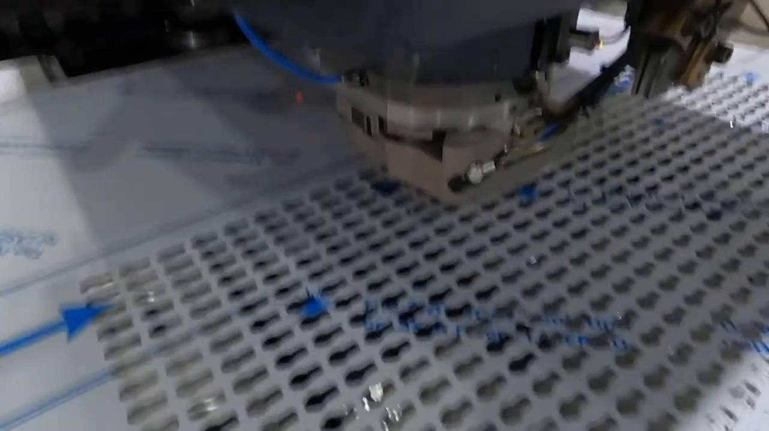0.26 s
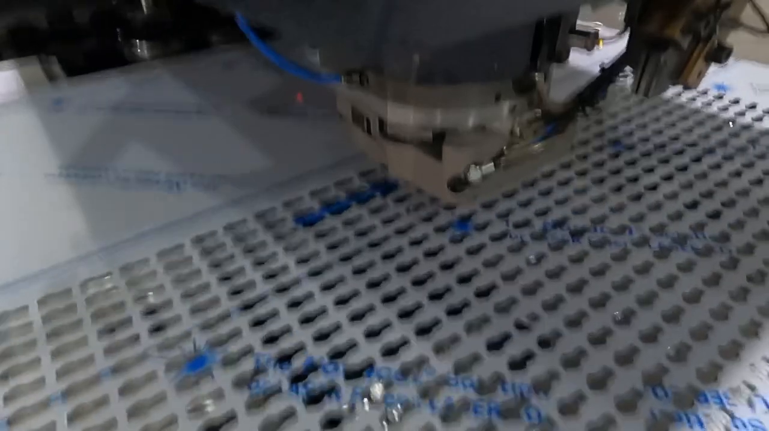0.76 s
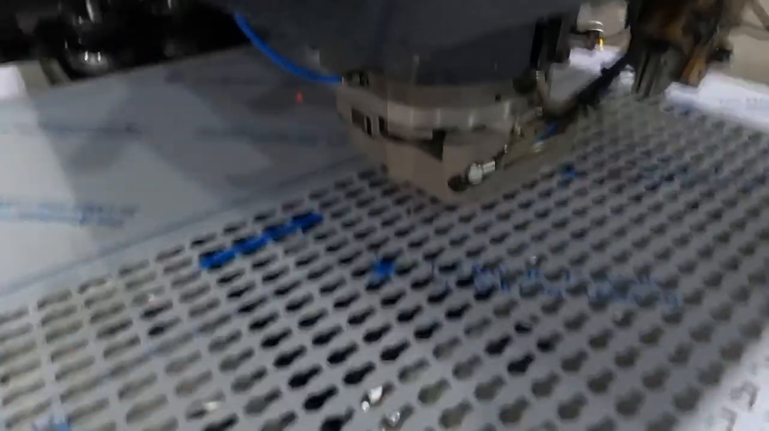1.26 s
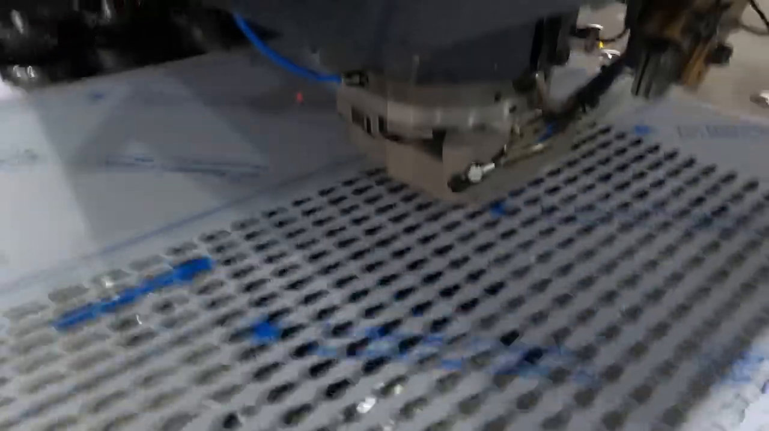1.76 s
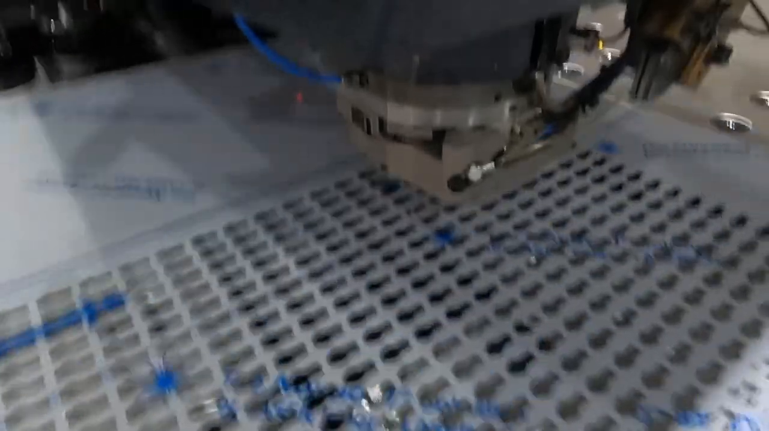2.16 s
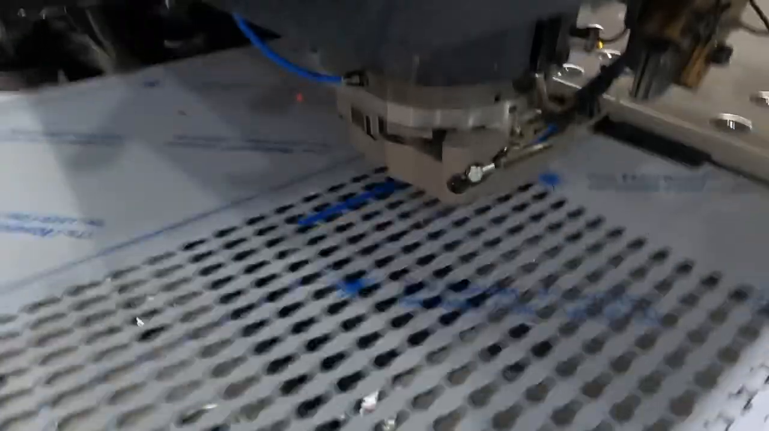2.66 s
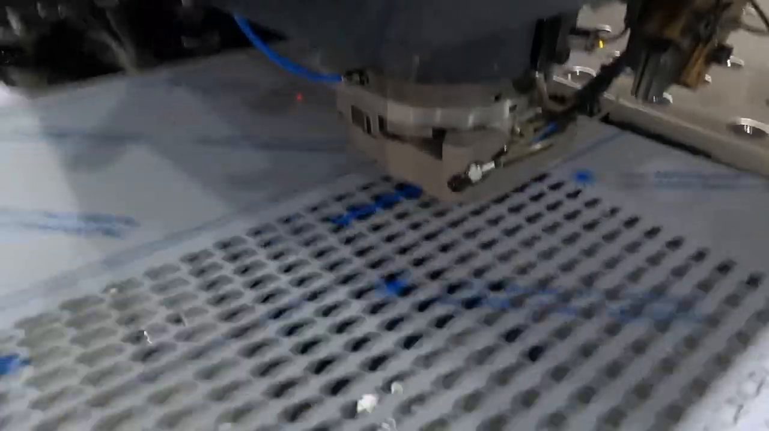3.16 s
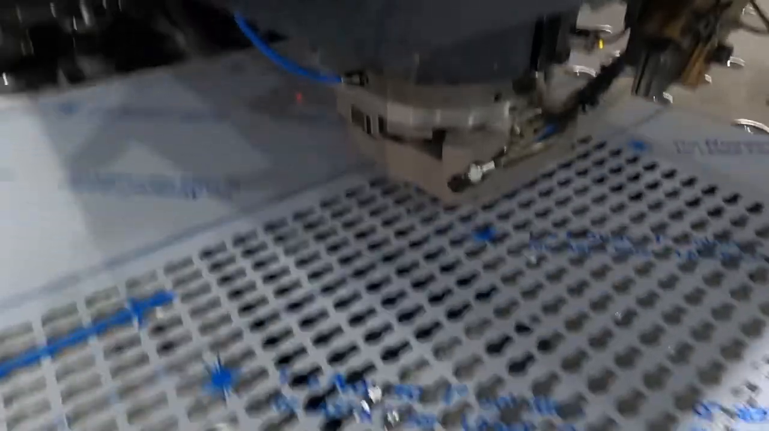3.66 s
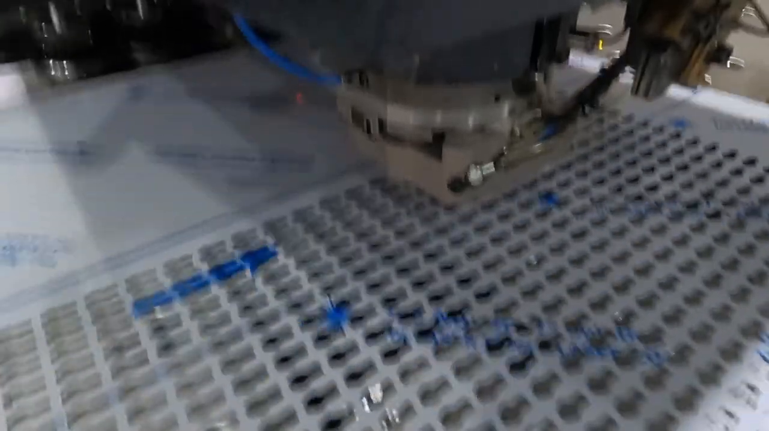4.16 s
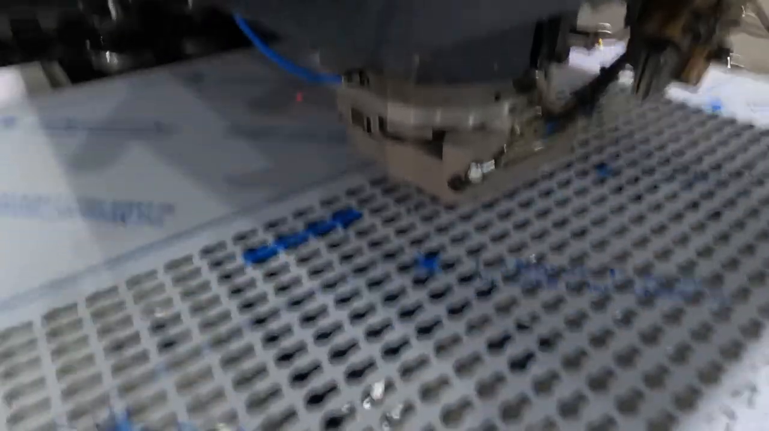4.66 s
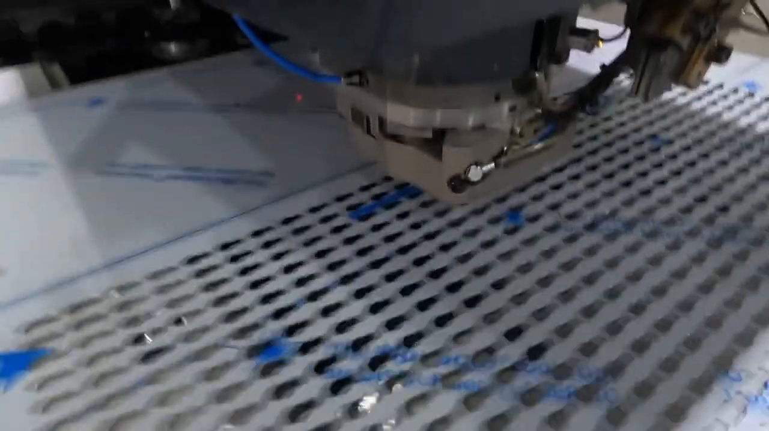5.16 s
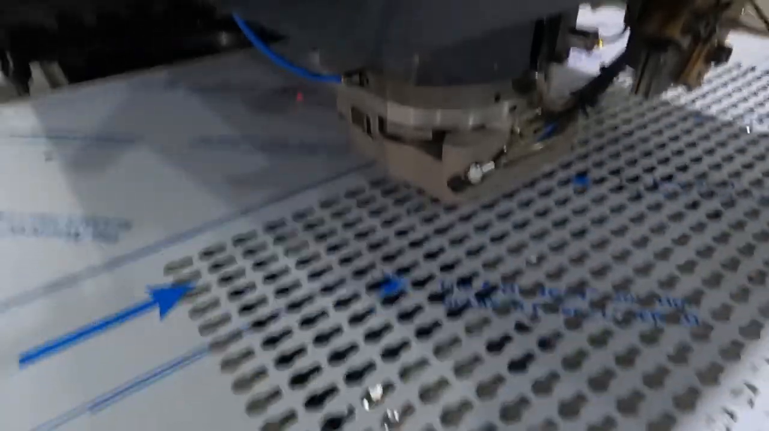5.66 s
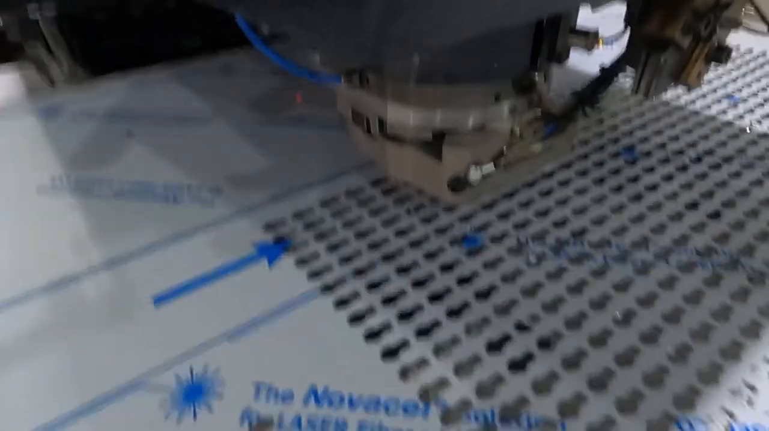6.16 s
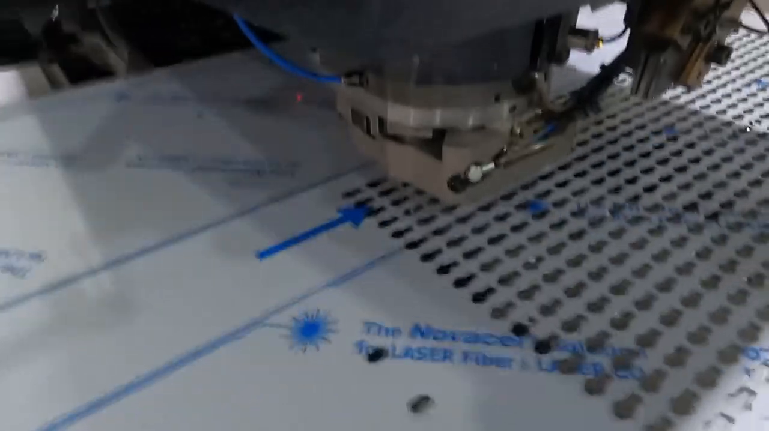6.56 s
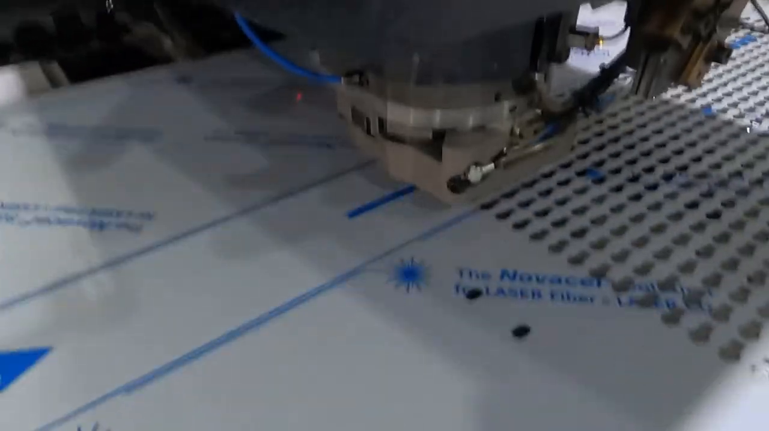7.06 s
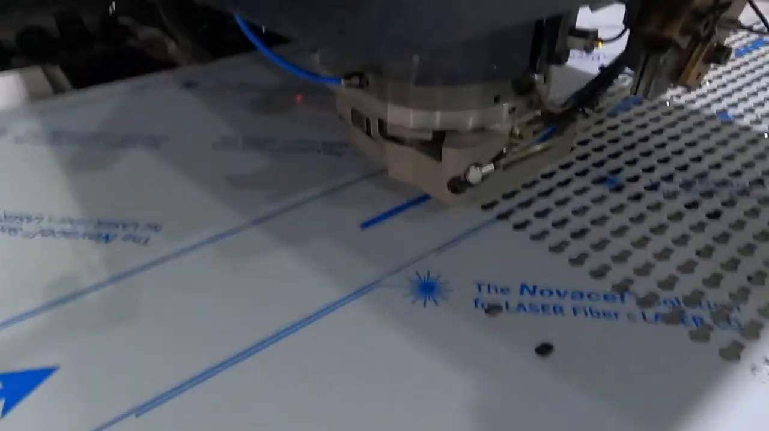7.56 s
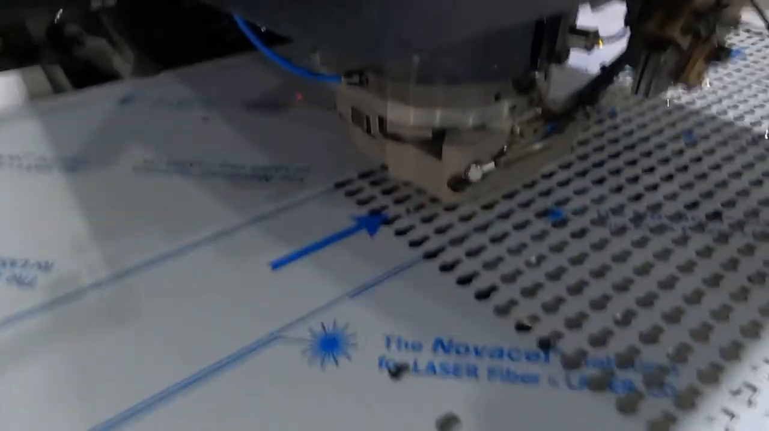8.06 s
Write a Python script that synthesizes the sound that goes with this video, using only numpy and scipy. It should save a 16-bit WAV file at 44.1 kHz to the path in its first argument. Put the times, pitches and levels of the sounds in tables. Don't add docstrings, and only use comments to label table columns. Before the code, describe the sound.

Close up, a punch press stamps sheet metal about six and a half times a second. Each stroke is a tight cluster of deep thuds, hollow metallic knocks, a crisp crack and sheet rattle. Suction air hisses constantly, pulsing with the strokes. A thin distant motor whine fades after about three seconds. Pumps and fans murmur in the large echoing hall; the phone evens and thickens the loud pounding.

```python
import sys
import numpy as np
from scipy import signal
from scipy.fft import rfft, irfft, next_fast_len
from scipy.io import wavfile
from scipy.ndimage import uniform_filter1d

SR = 44100
rng = np.random.default_rng(int(sys.argv[2]) if len(sys.argv) > 2 else 0)


def waveform_to_disk(signal):
    frames = np.transpose(np.atleast_2d(signal))
    scaled = np.clip(frames, -1, 1) * 32767
    samples = np.round(scaled).astype(np.int16)
    wavfile.write(sys.argv[1], SR, samples)


def boost(x):
    u = np.asarray(x, float) / 20
    return 10 ** u


N = 366030

# (time from break-through [ms], direction and size [factor], bed [dB], frame [dB],
# table [dB], ram [dB], sheet rattle [dB])
JOLTS = [
    (-12.5, 0.92, -0.5, -16.5, -19.5, 0.5, -1),
    (3, 1, -17, -3.5, -1.5, -9.5, -5),
    (21.5, -0.97, -2.5, 0.05, -12.5, -1.5, 3.5),
    (39.5, 0.99, -2, -14, -9, -7, -5),
    (45, 0.96, -3.5, -37, -0.7, -14, -11.5),
    (62.5, -0.93, -.6, -6.5, -0.2, -17.5, -7.5),
    (80, 0.87, -29, -25, -32, -13.5, -5.5),
    (88.5, -1.03, -25.5, -13, -13, -11.5, -10),
    (112, 1, -11.5, -9, -1.5, -19.5, -7.5),
]
# (frequency [Hz], level [dB], decay T60 [s])
BED_MODES = [(46, -9, 0.084), (57.6, -0.3, 0.22), (64, -5.5, 0.33)]
FRAME_MODES = [(93.8, -10.5, 0.3), (108.5, -12, 0.33)]
TABLE_MODES = [(164.87, -17.5, 0.4), (203, -28.0, 0.28), (248.5, -26.5, 0.28), (264.2, -27, 0.42),
               (298.7, -22, 0.42), (337.1, -22.5, 0.56), (419.5, -37, 0.3)]
RAM_MODES = [(491, -24.5, 0.16), (546, -17, 0.14), (588.8, -13, 0.14), (612.5, -14, 0.17),
             (685.7, -19.5, 0.17), (791, -29, 0.11), (971.6, -26, 0.29)]
PART_PAN_DB = [1.1, .9, .3, -.3]
PART_RISE_S = [.0002, .0002, .0002, .014]
# (near end of the row [dB], far end [dB],
# extra while the sheet moves outward [dB], scatter [dB])
PART_STRENGTH = [
    (-2, -1.9, 0.7, -0.2),
    (0.75, -1.5, -0.7, 0.25),
    (1.5, -0.65, -0.1, 1.44),
    (0.5, -0.9, 0, 1),
    (-20, -18.5, 0.5, 0.86),
]
# (break-through [s], stroke [number])
PACE = [(-.0744, 0), (1.3032, 9), (1.7654, 12), (1.922, 13), (2.6836, 18), (2.8394, 19), (3.0214, 20),
        (3.4813, 23), (3.793, 25), (5.7901, 38), (6.2493, 41), (6.4056, 42), (6.7122, 44), (6.862, 45),
        (7.3253, 48), (7.5073, 49), (7.8115, 51), (8.2739, 54)]
TRAVEL = [
    (-9, 0),
    (19, 1),
    (48, 0),
    (77, 1),
]
# (frequency [Hz], level [dB per Hz])
RATTLE_COLOUR = [(150, 0), (300, 3.5), (700, -4.5), (1200, 0), (1800, -10.5), (2800, -15.5), (4000, -32)]
# (frequency [Hz], level [dB per Hz])
CRACK_COLOUR = [(2000, -28), (3500, -0.5), (4500, -3.5), (6500, 9.5), (8000, 2.5), (11500, -4),
                (14000, -11), (16000, -7)]
# (frequency [Hz], level [dB per Hz])
JET_COLOUR = [(1500, -13.5), (2500, -7.5), (3200, -5.5), (4700, 1.55), (5500, 0), (6600, 1), (7600, -1.3),
              (8300, -7.5), (9300, -9), (11700, -6), (13600, -20.5), (14100, -32), (15500, -62)]
# (time from break-through [ms], level [dB])
CHOKE = [
    (-62, -3.5),
    (-19, 0.14),
    (2, 1),
    (11, -1.5),
    (46, 0.8),
    (102, 2.5),
    (109, 0.2),
]
# (time [s], level [dB])
WHINE_LEVEL = [
    (0.0, -27),
    (0.5, -27),
    (0.8, -29),
    (1.44, -25.5),
    (1.8, -30),
    (2.2, -25),
    (2.6, -23.5),
    (2.88, -25),
    (2.93, -34),
]
# (frequency [Hz], level [dB per Hz])
FACTORY_COLOUR = [(25, -27), (60, -19), (100, -2), (300, -5.5), (600, -11), (1170, -15), (1600, -20),
                  (2300, -27.5), (3500, -34), (8000, -70), (12000, -40.5), (15000, -53)]
# (frequency [Hz], side minus mid [dB])
FACTORY_WIDTH = [(60, -33), (300, -10), (1300, -11), (2400, -2.5), (5000, 8), (12000, 4)]
# (frequency [Hz], left minus right [dB])
PORTS = [(60, 1.5), (110, -1.5), (200, 1), (380, 1.5), (700, 1.5), (1290, -1.5), (2380, 1), (4400, 1),
         (8120, -2.5), (15000, -5)]

JOLT_SCATTER_MS, JOLT_SCATTER_DB = 0.08, 0.7
RAM_LEAD_MS = 4.475
ROW_END_DB, WIND_DOWN_MS = -24, (45, 110)
SUCTION_DB, SUCTION_DRIFT_DB = -29, 0.4
WHINE_HZ, RUN_DOWN_DB_PER_S = 1374, -30
SAG_DB, SAG_LEAD_S, SAG_RISE_S, SAG_RECOVER_S = -14, 0.0094, 0.017, 0.36
HALL_T60_S = 2.2
SIDES = np.array([[1], [-1]])


def shade(x, spectrum):
    hz, db = np.transpose(spectrum)
    length = x.shape[-1]
    size = next_fast_len(length)
    f = np.maximum(np.arange(size // 2 + 1) * SR / size, 1)
    gain = boost(np.interp(np.log(f), np.log(hz), db))
    return irfft(rfft(x, size) * gain, size)[..., :length]


def level(x, db):
    return x * boost(db) / np.sqrt(np.mean(x ** 2))


def walk(rate):
    hold = int(SR / rate)
    steps = np.repeat(rng.standard_normal(N // hold + 1), hold)
    return 1.32 * uniform_filter1d(uniform_filter1d(steps, hold), hold)[:N]


def pan(x, db):
    return x * boost(np.array([[db], [-db]]) / 2)


def strike(seconds, sizes, response):
    lead = SR // 4
    train = np.zeros(N + 2 * lead)
    at = np.round(np.ravel(seconds) * SR).astype(int) + lead
    np.add.at(train, at, np.ravel(sizes))
    return signal.fftconvolve(train, response)[lead:lead + N]


def ring(modes, rise_s):
    t = np.arange(SR // 2) / SR
    total = 0
    for k, (hz, db, t60) in enumerate(modes):
        decay = np.exp(-np.log(1000) * t / t60)
        total = total + (-1) ** k * boost(db) * np.sin(2 * np.pi * hz * t) * decay
    return (1 - np.exp(-t / rise_s)) * total


def puff(rise_s, t60):
    t = np.arange(SR // 4) / SR
    return (1 - np.exp(-t / rise_s)) * np.exp(-np.log(1000) * t / t60)


def strokes():
    seconds, number = np.transpose(PACE)
    every = np.arange(number[-1] + 1)
    return np.interp(every, number, seconds), np.interp(every, *np.transpose(TRAVEL))


def strength(part, place):
    near_db, far_db, outward_db, scatter_db = PART_STRENGTH[part]
    outward = np.gradient(place) > 0
    travel_db = near_db + (far_db - near_db) * place + outward_db * outward
    return travel_db + scatter_db * rng.standard_normal(len(place))


def press():
    (start, place), jolts = strokes(), np.array(JOLTS)
    jolt_ms = jolts[:, 0]
    chance = rng.standard_normal((len(start), 2, len(jolts)))
    when = start[:, None] + (jolt_ms + JOLT_SCATTER_MS * chance[:, 0]) / 1000
    scatter_db = JOLT_SCATTER_DB * chance[:, 1]
    row_end = place % 1 == 0
    rest_db = ROW_END_DB * np.outer(row_end, np.interp(jolt_ms, WIND_DOWN_MS, [0, 1]))
    body = 0
    for k, modes in enumerate((BED_MODES, FRAME_MODES, TABLE_MODES, RAM_MODES)):
        jolt_db = jolts[:, 2 + k] + strength(k, place)[:, None] + scatter_db + rest_db
        lead_ms = RAM_LEAD_MS if k == 3 else 0
        part = strike(when - lead_ms / 1000, jolts[:, 1] * boost(jolt_db), ring(modes, PART_RISE_S[k]))
        body = body - pan(part, PART_PAN_DB[k])
    shake = strike(when, boost(jolts[:, 6] + 3 * scatter_db + rest_db), puff(0.0011, t60=0.092))
    mid, side = shade(rng.standard_normal((2, N)), RATTLE_COLOUR)
    rattle = level(mid, -23.5) * shake + level(side, -34.5) * shake * SIDES
    return body + rattle


def crack():
    start, place = strokes()
    db = strength(4, place)
    burst = strike(start - 0.0024, boost(db), puff(0.0005, t60=0.071))
    rebound = strike(start + 0.0048, boost(db - 29), puff(0.0045, t60=0.049))
    noise = level(shade(rng.standard_normal(N), CRACK_COLOUR), -2.1)
    return pan(noise * (burst + rebound), -0.1)


def jet():
    start, t = strokes()[0], np.arange(N) / SR
    ms, db = np.transpose(CHOKE)
    begins = start - 0.028
    ends = np.r_[begins[1:], 99]
    choke_db = np.zeros(N)
    for s, begin, end in zip(start, begins, ends):
        choke_db += np.interp(1000 * (t - s), ms, db) * (t >= begin) * (t < end)
    air = level(shade(rng.standard_normal(N), JET_COLOUR), 0.3)
    air = air * boost(SUCTION_DB + SUCTION_DRIFT_DB * walk(2.5))
    flutter_db = 0.6 * walk(40)
    return pan(air * boost(choke_db + flutter_db), -0.1)


def whine():
    t, (seconds, db) = np.arange(N) / SR, np.transpose(WHINE_LEVEL)
    starts = strokes()[0] - SAG_LEAD_S
    sag_db = SAG_DB * strike(starts, np.ones(len(starts)), puff(SAG_RISE_S, t60=SAG_RECOVER_S))
    run_down_db = RUN_DOWN_DB_PER_S * np.maximum(t - seconds[-1], 0)
    note = np.sin(2 * np.pi * WHINE_HZ * t + 0.11 * walk(12.27))
    beat = boost(0.62 * walk(24.6) - 1.3) * note
    return np.sqrt(2) * boost(np.interp(t, seconds, db) + sag_db + run_down_db) * beat


def hall(x):
    t = np.arange(SR) / SR
    tail = rng.standard_normal((2, SR)) * np.exp(-np.log(1000) * t / HALL_T60_S)
    tail = tail * (t > 0.012)
    tail = tail / np.sqrt(np.sum(tail ** 2) / 2)
    return signal.fftconvolve(x[None], tail, axes=1)[:, :N]


def factory():
    mid, side = level(shade(rng.standard_normal((2, N)), FACTORY_COLOUR), -22.5)
    swell = boost(0.4 * walk(3))
    return (mid + shade(side, FACTORY_WIDTH) * SIDES) * swell


def scene():
    near, far = press() + crack() + jet(), whine()
    near_echo = boost(-18.5) * hall(near.mean(0))
    far_echo = boost(-9.5) * hall(far)
    return near + near_echo + pan(far, -0.36) + far_echo + factory()


def band_limit(x):
    return signal.sosfilt(signal.butter(12, 15660, fs=SR, output="sos"), x)


def record(dry):
    x = np.array([shade(v, np.array(PORTS) * [1, side / 2]) for v, side in zip(dry, (1, -1))])
    x = signal.sosfilt(signal.butter(2, 32, "highpass", fs=SR, output="sos"), x)
    loud = signal.lfilter([1 / 900], [1, 1 / 900 - 1], np.abs(x).mean(0), zi=[0.17])[0]
    x = x * (0.2 / loud) ** 0.26
    return band_limit(np.tanh(0.96 * x) / 0.88)


dry = scene()
out = record(dry)
waveform_to_disk(out)
```